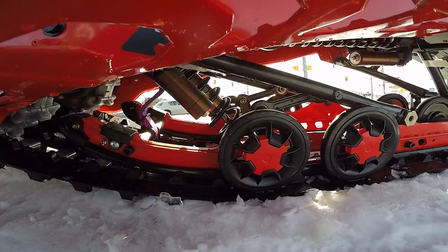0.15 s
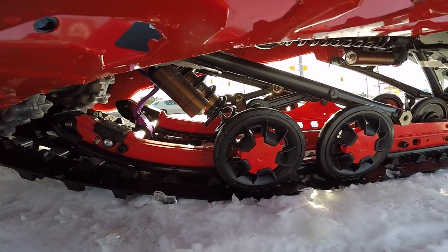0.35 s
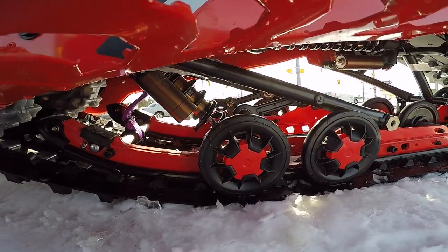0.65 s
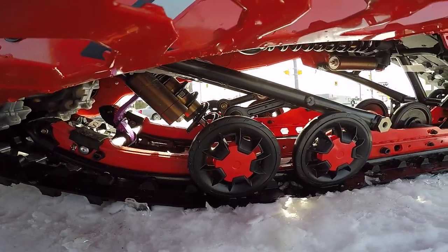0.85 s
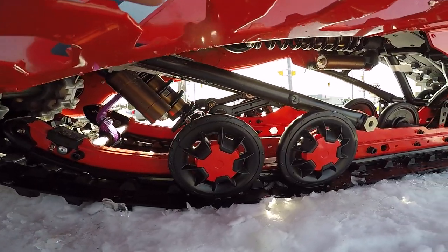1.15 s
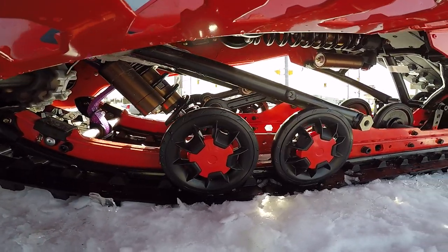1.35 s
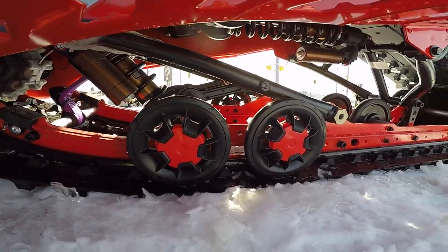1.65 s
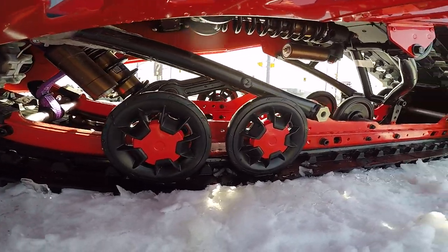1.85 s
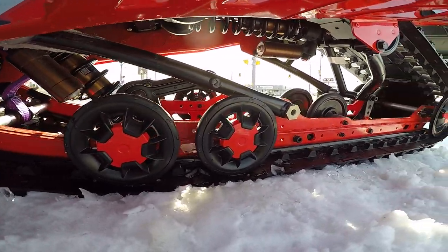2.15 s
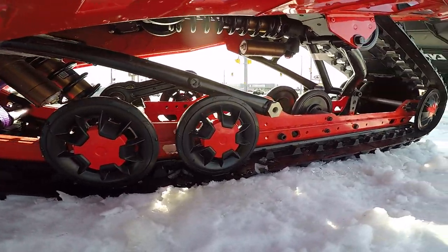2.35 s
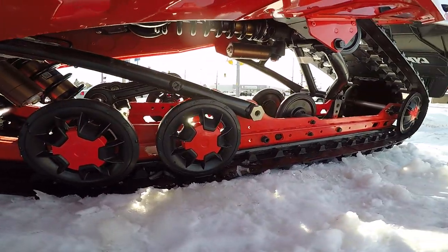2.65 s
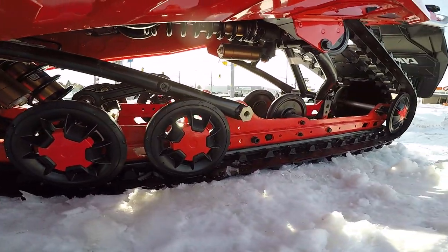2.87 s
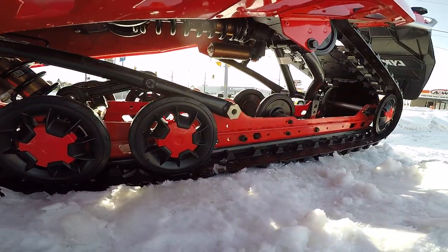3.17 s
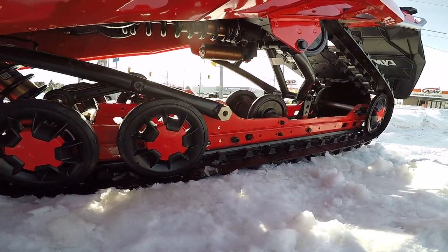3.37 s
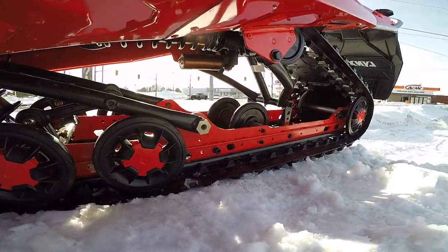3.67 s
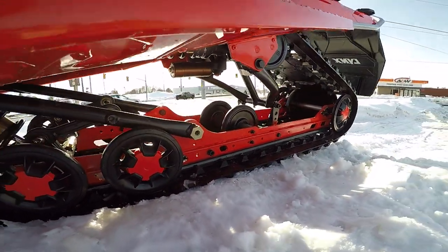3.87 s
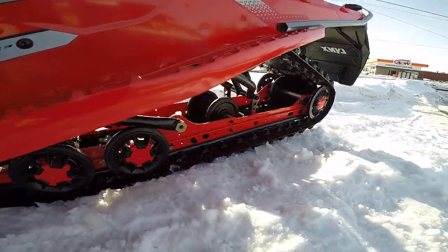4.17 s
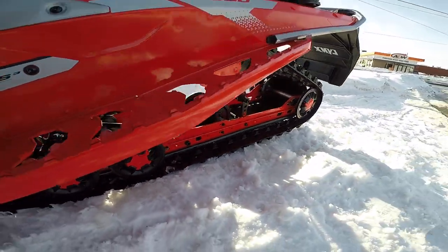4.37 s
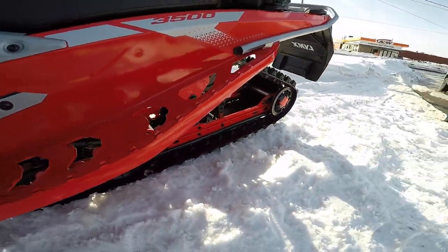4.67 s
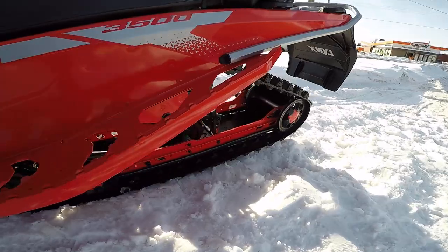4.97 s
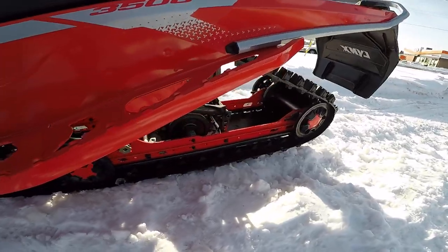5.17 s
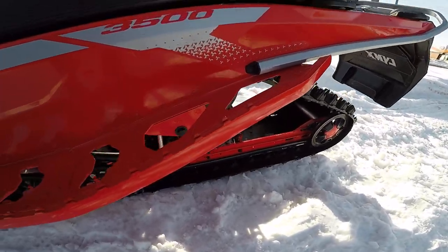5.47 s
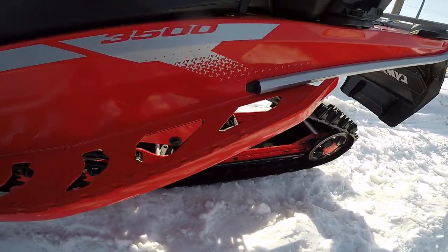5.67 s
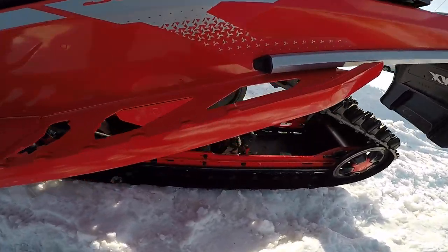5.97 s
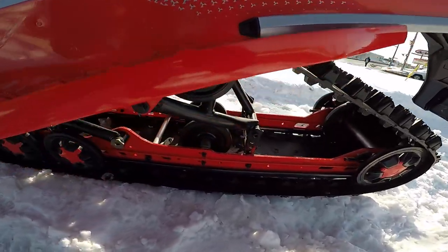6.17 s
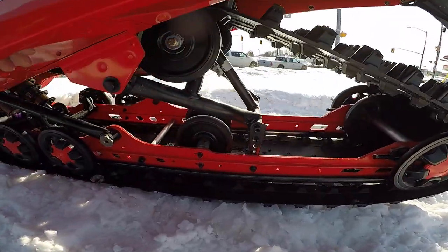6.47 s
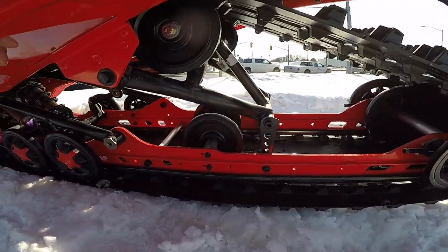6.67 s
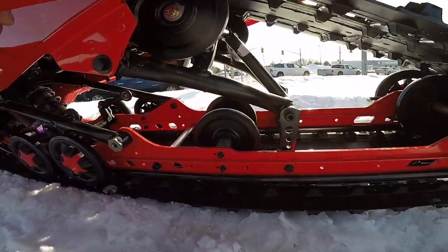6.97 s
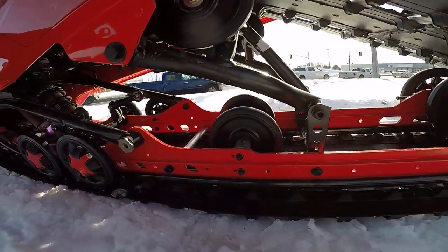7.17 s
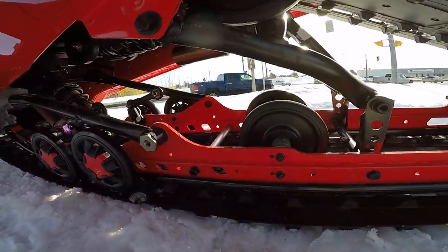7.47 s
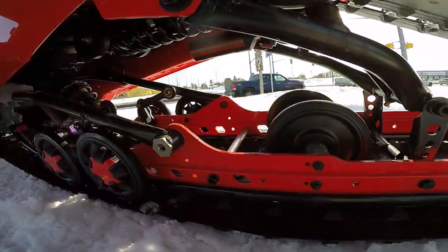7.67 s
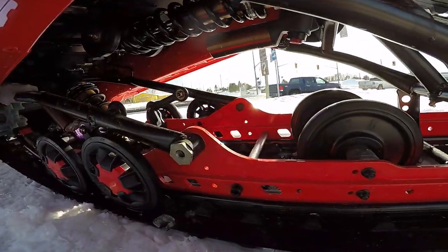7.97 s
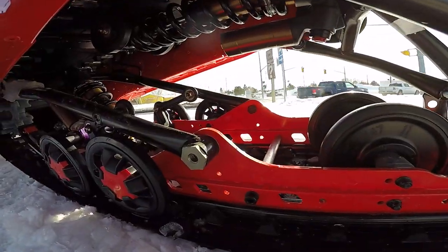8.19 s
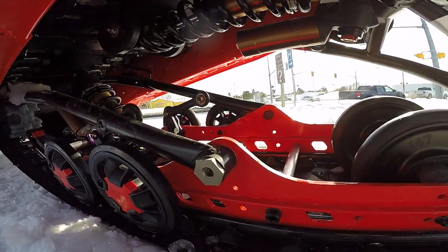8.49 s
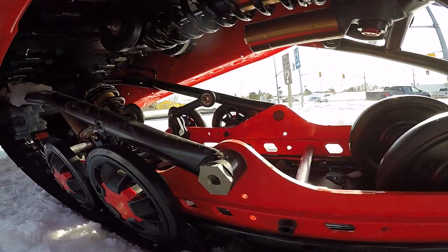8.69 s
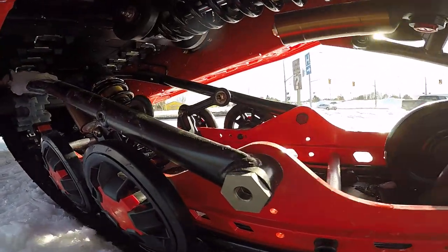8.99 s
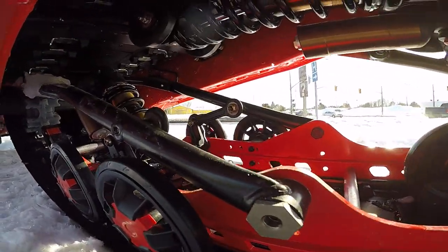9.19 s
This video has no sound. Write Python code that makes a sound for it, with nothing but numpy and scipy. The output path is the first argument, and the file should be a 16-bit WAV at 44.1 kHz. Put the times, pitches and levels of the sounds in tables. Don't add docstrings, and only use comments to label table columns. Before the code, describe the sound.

Wind rumbles on the stereo microphone, then at 0.2 s a sharp housing click lands with a heavy low thump and the sound briefly ducks. A faint slow engine idle appears from about 0.4 s. At 1.5 s the engine revs up quickly, its low pitch roughly doubling by 2 s, wavers up and down until about 4 s, then settles into a steady throaty drone that creeps slightly upward. Wind pops and buffets throughout. Light boot crunches come between 4.2 and 6 s, with another near 8.9 s. At 6.1 to 6.25 s, gusts slap the right side and another click snaps. Wet tyres roar and hiss continuously, brighter after 6.5 s; a vehicle's hum slows and drops around 7.5 s, and a distant truck climbs from 7.8 to 9 s. Strong gusts close the scene at 9.3 s as the drone weakens.

```python
import sys
import numpy as np
from scipy import signal
from scipy.io import wavfile
from scipy.ndimage import uniform_filter1d

SR = 44100
rng = np.random.default_rng(int(sys.argv[2]) if len(sys.argv) > 2 else 0)


def gain_from_db(level_db):
    decades = np.asarray(level_db, float) / 20
    return 10 ** decades


def master(y):
    cut = np.clip(np.atleast_2d(y).T, -1, 1)
    pcm = np.round(cut * 32767)
    wavfile.write(sys.argv[1], SR, pcm.astype(np.int16))


N = 411805
TIME = np.arange(N) / SR
SIDES = np.array([[.5], [-.5]])


def rms_one(x):
    return x / np.sqrt(np.mean(x ** 2) + 1e-20)


def in_time(rows):
    s, *columns = np.transpose(rows)
    return [np.interp(TIME, s, column) for column in columns]


def at_hz(points, hz):
    points_hz, values = np.array(points).T
    return np.interp(np.log(hz), np.log(points_hz), values)


def drift(rate_hz):
    hop = 40
    pole = np.exp(-2 * np.pi * rate_hz * hop / SR)
    white = rng.standard_normal(N // hop + 2002)
    slow = signal.lfilter([1], [1, -2 * pole, pole * pole], white)[2000:]
    return np.interp(np.arange(N) / hop, np.arange(len(slow)), rms_one(slow))


def band(x, low_hz, high_hz, order=2):
    return signal.sosfilt(signal.butter(order, [low_hz, high_hz], "band", fs=SR, output="sos"), x)


def add_damped_swing(out, s, hz, t60, left_right, fall):
    t = np.arange(int(np.clip(t60, .002, .2) * SR)) / SR
    i = max(round(s * SR), 0)
    phase = 2 * np.pi * np.cumsum(hz / (1 + fall * t / t60)) / SR
    onset = np.clip(t / (0.059 * t60), 0, 1)
    wave = np.sin(phase) * gain_from_db(-60 * t / t60) * onset
    out[:, i:i + len(t)] += np.outer(left_right, wave)[:, :N - i]


# pitch_hz, likeness (-1 to 1)
COHERENCE = [(30, 1), (300, 0.63), (600, 0.049), (900, 0.35), (1300, -0.03), (3000, 0.51), (4000, 0.71),
             (6000, 0.64), (7000, 0.31), (8000, 0.35), (12000, -0.9)]
# pitch_hz, left_right_db
PORT_LEAN = [(300, -2.5), (1000, 2.5), (1700, 2.5), (2300, 0), (3200, -1.5), (4200, 0), (5500, 3.5),
             (6300, -1), (7000, -10), (7800, -8), (8800, -11), (10000, -14), (12000, -4.5)]


def banded_noise(spectrum, patchy_db, count):
    edges = np.geomspace(spectrum[0][0], spectrum[-1][0], count + 1)
    out, together, white = 0, drift(2.2), rng.standard_normal((2, 2, N))
    for k, (low, high) in enumerate(zip(edges, edges[1:])):
        mid, side = band(white[k % 2], low, high)
        hz = np.sqrt(low * high)
        alike = np.clip(at_hz(COHERENCE, hz), -1, 1)
        gain = gain_from_db(at_hz(spectrum, hz) + patchy_db * (0.84 * together + drift(12)))
        lean = gain_from_db(at_hz(PORT_LEAN, hz) * SIDES)
        pair = np.sqrt(1 + alike) * mid + np.sqrt(1 - alike) * side * [[1], [-1]]
        out = out + gain * lean * pair
    return rms_one(out)


def orders(hz, levels, on, waver_db, wobble):
    angle = 2 * np.pi * np.cumsum(hz) / SR + wobble * drift(4.2)
    out = 0
    for k, db in levels:
        out = out - np.sqrt(2) * gain_from_db(db + waver_db * drift(4.6)) * np.sin(k * angle)
    return on * out


# start_s, cycle_hz, order_4_db, order_5_db
SLOW_IDLE = [
    (0.4, 20.6, -33.5, -39.5),
    (1.45, 21.08, -27.5, -27),
    (1.55, 21.1, -22.5, -48),
]


def slow_idle():
    hz, db4, db5 = in_time(SLOW_IDLE)
    on = np.interp(TIME, [.3, .45, 1.5, 1.6], [0, 1, 1, 0])
    return orders(hz, [(4, db4), (5, db5)], on, waver_db=3.0, wobble=0.17)


# start_s, cycle_hz, level_db, uneven_db (cylinder unevenness, which feeds the odd orders)
FAST_IDLE = [(1.5, 20.93, -15, -6), (1.61, 22.15, -10, 0.1), (1.78, 33.3, -17.5, 4.5),
             (1.94, 39.35, -15, -1), (2.25, 39.1, -16.5, 2.5), (2.56, 42.4, -15.5, 2), (2.9, 32.46, -15, 1),
             (3.2, 37.5, -15.5, 3.5), (3.53, 42.1, -14.5, 1.5), (4.01, 38.15, -15, 5.5),
             (4.6, 38.7, -12.5, -2), (5.8, 39.05, -12.5, -1.5), (6.4, 39.18, -20, 10.5),
             (7.3, 39.66, -16, 4.5), (7.75, 40.37, -24, 7.5), (8.3, 40.76, -15.5, -2),
             (8.85, 41.21, -20, 10.5), (9.15, 41.5, -22, 7)]
# order, level_db
PIPE_ORDERS = [(2, 0.9), (3, -6), (4, -12)]
# order, level_db
UPPER_ORDERS = [(5, -50), (6, -35), (7, -51), (8, -52)]
# pitch_hz, level_db
PIPE_RADIATION = [(42, -28), (66, -3), (78, 0.8), (100, 1), (120, -0.4), (160, 1.1), (200, -3.5), (240, -2)]


def fast_idle():
    hz, loud_db, uneven_db = in_time(FAST_IDLE)
    hz = uniform_filter1d(hz, size=SR // 18)
    levels = [(k, loud_db + db + at_hz(PIPE_RADIATION, k * hz) + uneven_db * (k % 2))
              for k, db in PIPE_ORDERS]
    firing_db = levels[0][1]
    levels += [(0.74, firing_db - 36)]
    settle_db = np.interp(TIME, [3.2, 3.8], [-8, 0])
    upper_db = 0.21 * (loud_db - loud_db.mean()) + settle_db
    levels += [(k, db + at_hz(PIPE_RADIATION, k * hz) + upper_db) for k, db in UPPER_ORDERS]
    on = np.interp(TIME, [1.48, 1.58, 9.15, 9.33], [0.05, 0.88, 0.71, .15])
    burble = rng.standard_normal((2, N))
    burble = rms_one(band(burble[0] + .5 * burble, 330, 650))
    return orders(hz, levels, on, waver_db=0.68, wobble=0.035) + gain_from_db(firing_db - 38) * burble


# start_s, level_db
BREEZE = [(0, -13.5), (.19, -14.5), (.25, -29.5), (.6, -35), (1.2, -34), (2.0, -33.5), (3.0, -32),
          (4.0, -23.5), (4.4, -35), (5.4, -40), (6.0, -23.5), (6.5, -36), (7.0, -33.5), (7.5, -16.5),
          (8.4, -24.5), (9.1, -16.5), (9.34, -16.5)]
# peak_s, peak_db, half_length_s
GUST_SWELLS = [(1.143, -31.5, 0.6), (1.692, -23.5, 0.6), (2.384, -15, 0.12), (2.94, -18.5, 0.9),
               (3.195, -23, 0.094), (3.737, -16.5, 0.11), (4.65, -24, 0.15), (6.205, -21, 0.15),
               (7.687, -21, 0.28), (8.012, -20, .16), (8.808, -16, 0.18), (9.132, -8.5, 0.15)]


def wind():
    breeze = gain_from_db(in_time(BREEZE)[0])
    gusts = sum(gain_from_db(db) * np.clip(1 - np.abs(TIME - s) / half, 0, 1) ** 2
                for s, db, half in GUST_SWELLS)
    lumps = gain_from_db(3.2 * np.array([drift(9), drift(9)]))
    buffet = rms_one(band(rng.standard_normal((2, N)), 28, 116) * lumps)
    buffet = rms_one(buffet - .12 * buffet[::-1])
    flicker = gain_from_db(2.0 * np.array([drift(30), drift(30)]))
    flutter = band(rng.standard_normal((2, N)), 142, 294, order=3) * lumps * flicker
    flutter = rms_one(flutter - 0.31 * flutter[::-1]) * gain_from_db(-3.0 * SIDES)
    rasp = rms_one(band(rng.standard_normal(N), 380, 800) * gain_from_db(6.0 * drift(40))) * [[.75], [-1]]
    buffet = buffet * (gain_from_db(-1.5) * breeze + gain_from_db(-1.0) * gusts)
    flutter = flutter * (gain_from_db(-13) * breeze + gain_from_db(-16) * gusts)
    rasp = rasp * (gain_from_db(-20.5) * breeze + gain_from_db(-32.5) * gusts)
    return buffet + flutter + rasp


# start_s, thud_db, snap_db (above thud), left_right_db
EDDY_POPS = [(0.034, -16.5, -15, -4), (0.113, -13, -21, 15), (0.832, -9, 4.5, 1), (0.956, -18, -12, 1),
             (1.17, -23, -19, 3), (1.224, -14.5, 4, -10.5), (1.278, -16.5, -11, 0), (2.196, -20.5, 1, -3),
             (2.373, -12.5, -8, -4.5), (2.72, -17, -19, -11.5), (3.03, -15.5, -18, -6),
             (3.614, -29, 7.5, -8), (3.713, -16.5, -18, -8), (3.764, -21, -6, 3), (3.918, -29, 9, -2),
             (5.08, -21.5, -4, -10), (5.9, -22, -6, 0), (6.111, -10, -2.5, -10), (6.147, -14, -26, -2.5),
             (6.248, -9, -3.5, -1), (7.068, -22, -9, -7.5), (7.356, -22, -7, 1), (7.601, -15.5, -9, -6),
             (7.716, -12.5, -29, -6), (8.026, -21, -7, 12), (8.356, -18, 4, -2), (8.779, -13, -11, 3),
             (8.912, -8.5, -5, 9), (9.035, -9.5, -5, 3), (9.258, -12, -25, 18)]


def pops():
    out, chance = np.zeros((2, N)), rng.random((len(EDDY_POPS), 3))
    for (s, thud_db, snap_db, lean_db), (low, high, flip) in zip(EDDY_POPS, chance):
        sign = 1 if flip > .5 else -1
        snap = sign * gain_from_db(thud_db + snap_db + 12.0) * np.array([.85, -1])
        thud = sign * gain_from_db(thud_db + 11.0 + lean_db * SIDES[:, 0]) * [-.6, 1]
        add_damped_swing(out, s, 600 + 200 * high, .009, snap, fall=1.5)
        add_damped_swing(out, s, 280 + 80 * low, .035, thud, fall=6.2)
    return band(out + 1e-18, 45, 1600)


# start_s, level_db, decay_s
GUST_SLAPS = [
    (6.111, -11, 0.064),
    (6.247, -15, 0.048),
    (9.235, -20, 0.14),
    (0.37, -28, 0.065),
]


def slaps():
    level = sum(gain_from_db(db - 60 * np.clip(TIME - s, 0, 1) / decay) * (TIME >= s)
                for s, db, decay in GUST_SLAPS)
    noise = band(level * rng.standard_normal(N) + 1e-18, 217, 423) * [[-2.5], [18]]
    return band(noise + 1e-18, 45, 1600)


# start_s, peak_db, left_right_db, decay_s
HOUSING_CLICKS = [
    (0.1837, -10, -8, 0.0058),
    (6.2295, -9.5, -12.5, 0.0073),
]
# pitch_hz, width_hz, level_db
HOUSING_MODES = [
    [(1150, 1000, 3), (3330, 1400, -2), (5000, 950, -6), (7000, 800, -4.5), (10000, 650, -12.5),
     (13300, 1200, -33.5)],
    [(1500, 1500, -16.5), (4630, 790, -6), (5270, 630, -4.5), (6530, 990, 0), (7200, 1100, -7),
     (9800, 1100, -16.5), (13500, 1500, -28)],
]


def clicks():
    out = np.zeros((2, N))
    t = TIME[:SR // 20]
    for (s, db, lean_db, decay), modes in zip(HOUSING_CLICKS, HOUSING_MODES):
        crackle = rng.standard_normal((2, len(t)))
        crackle[:, 0] = 2.95
        crackle = (crackle[0] + 0.35 * crackle) * gain_from_db(-60 * t / decay)
        for hz, width_hz, mode_db in modes:
            rung = band(crackle, hz - width_hz / 2, hz + width_hz / 2)
            out[:, round(s * SR):][:, :len(t)] += gain_from_db(db + mode_db + 3.0 + lean_db * SIDES) * rung
    return out


# start_s, peak_db, pitch_hz
PRESSURE_THUMPS = [
    (.1845, -8, 400),
    (.1868, -0.5, 70),
    (.313, -4.5, 27),
]


def thumps():
    swings = np.zeros(N)
    for s, db, hz in PRESSURE_THUMPS:
        turn = np.clip((TIME - s) * hz, 0, 1)
        swings += gain_from_db(db + 1.2) * np.sin(2 * np.pi * turn ** .85) * (1 - .5 * turn)
    return signal.sosfilt(signal.butter(2, 900, fs=SR, output="sos"), swings)


# pitch_hz, level_db (per Hz)
ROAR_SPECTRUM = [(300, 3), (500, -8.5), (750, -4.5), (950, -0.5), (1250, -5.5), (1500, -4), (1900, -16),
                 (2400, -15)]
# pitch_hz, level_db (per Hz)
SLUSH_SPECTRUM = [(1500, 0.5), (2000, -0.5), (2800, 1), (3500, -2.5), (4200, 2.5), (5000, -15.5)]
# pitch_hz, level_db (per Hz)
HISS_SPECTRUM = [(4300, -9), (5000, -7), (5600, 0.5), (6200, 3), (6900, -4), (7800, -8), (9000, -19),
                 (11000, -35.5), (13500, -38.5)]


def surface_noises():
    roar = banded_noise(ROAR_SPECTRUM, patchy_db=0.47, count=9)
    slush = banded_noise(SLUSH_SPECTRUM, patchy_db=0.75, count=6)
    hiss = banded_noise(HISS_SPECTRUM, patchy_db=1.25, count=10)
    return roar, slush, hiss


# start_s, bright_db, dull_db, length_s
BOOT_CRUNCHES = [
    (0.107, -50, -44.5, 0.02),
    (4.221, -43.5, -56.5, 0.094),
    (4.802, -40, -45, 0.021),
    (4.835, -57.5, -41.5, 0.035),
    (4.977, -52.5, -53, 0.023),
    (5.315, -40.5, -40, 0.032),
    (5.614, -51.5, -50.5, 0.1),
    (5.807, -48, -44.5, 0.097),
    (5.929, -55.5, -44, 0.099),
    (8.893, -48.5, -41, 0.08),
]


def crunch_level(column):
    shape = 0
    for row in BOOT_CRUNCHES:
        s, length = row[0], row[3]
        envelope = np.interp(TIME - s, [0, .005, length / 2, 1.7 * length], [0, 0.59, 0.57, 0.027])
        shape = shape + gain_from_db(row[column]) * envelope
    return shape * gain_from_db(1.7 * drift(90))


def boots():
    roar, slush, hiss = surface_noises()
    bright = rms_one(signal.lfilter([1, -.95, .9], [1], hiss))
    return crunch_level(column=1) * bright + crunch_level(column=2) * (slush + roar + 1.16 * hiss)


# start_s, pitch_hz, level_db
SLOWING_VAN = [
    (6.3, 103.7, -49),
    (6.7, 102.8, -20.5),
    (7.1, 102.7, -28.5),
    (7.4, 90.56, -27),
    (7.7, 66.4, -22),
    (7.85, 55, -48.5),
]
# start_s, pitch_hz, level_db
FAR_CAR = [
    (4.1, 261, -54),
    (4.4, 273.7, -48),
    (4.8, 289.3, -44),
    (5.2, 302, -57),
]
# start_s, pitch_hz, level_db
FAR_TRUCK = [
    (7.7, 212, -45),
    (7.9, 218, -34),
    (8.2, 222, -35.5),
    (8.45, 230, -31),
    (8.7, 243, -32),
    (8.95, 243, -38),
    (9.1, 243, -47),
]


def far_vehicles():
    hz, db = in_time(SLOWING_VAN)
    van_on = (TIME > 6.3) & (TIME < 7.85)
    van = orders(hz, [(1, db), (2, db - 17)], van_on, waver_db=3.0, wobble=0.16)
    hz, db = in_time(FAR_CAR)
    car = orders(hz, [(0.96, db)], (TIME > 4.1) & (TIME < 5.2), waver_db=5.5, wobble=.3)
    hz, db = in_time(FAR_TRUCK)
    truck = orders(hz, [(1, db)], TIME > 7.7, waver_db=1.5, wobble=.2)
    return van + car + truck


# closest_s, level_db, approach_db_per_s, departure_db_per_s
CAR_PASSES = [
    (1.199, -49, 7, 3),
    (7.0, -42, 54, 1.5),
    (8.601, -47, 12.5, 10),
]


def tread_whirr():
    level = 0
    for s, db, rise, fall in CAR_PASSES:
        approach_db = rise * np.clip(s - TIME, 0, None)
        departure_db = fall * np.clip(TIME - s, 0, None)
        gone_db = 26.5 * np.clip(TIME - s - 0.71, 0, .4)
        level = level + gain_from_db(db - approach_db - departure_db - gone_db)
    whirr = rng.standard_normal((2, N))
    whirr = rms_one(band(whirr[0] + 1.4 * whirr, 1153, 1420))
    return level * gain_from_db(0.91 * drift(8.9)) * whirr


# start_s, level_db, bright_db (as wet tyres come near)
TRAFFIC = [(0, -45, -5), (.8, -47, -7), (1.2, -45, -3), (2.0, -44, -8), (3.8, -47, -1), (5.0, -42.5, -5.5),
           (5.6, -43, -1), (6.0, -43, -4.5), (6.5, -44, 4.5), (7.3, -40, 2.5), (7.7, -44, 6),
           (8.3, -39.5, 0.4), (9.0, -40.5, -0.3), (9.32, -43.5, 1.8)]
# pitch_hz, level_db (per Hz)
RUMBLE_SPECTRUM = [(20, 3), (50, -0.5), (90, 5), (130, 3.5), (220, -11.5), (350, -18.5), (500, -47.5)]


def road():
    loud_db, bright_db = in_time(TRAFFIC)
    breeze_db, = in_time(BREEZE)
    roar, slush, hiss = surface_noises()
    rumble_db = -25 + 0.18 * (breeze_db - breeze_db.mean()) + .6 * (loud_db - loud_db.mean())
    rumble = gain_from_db(rumble_db) * banded_noise(RUMBLE_SPECTRUM, patchy_db=0.0, count=9)
    tyres = gain_from_db(2.5) * roar + gain_from_db(1.5 + bright_db) * slush + gain_from_db(0.5 + 0.73 * bright_db) * hiss
    return rumble + gain_from_db(loud_db) * tyres


def scene():
    near = slow_idle() + fast_idle() + wind() + pops() + slaps() + clicks() + thumps() + boots()
    return near + far_vehicles() + tread_whirr() + road()


def top_cut(x):
    return signal.sosfilt(signal.butter(12, 14600, fs=SR, output="sos"), x)


# start_s, depth_db, attack_s, recovery_s
GAIN_DUCKS = [
    (0.191, 6, 0.0056, 0.088),
    (.3, 6.5, 0.093, 0.33),
    (6.111, 5.5, 0.0034, 0.014),
    (6.254, 7, 0.013, 0.018),
    (9.04, 3, 0.0039, 0.038),
]


def record(dry):
    duck_db = 0
    for s, db, attack, back in GAIN_DUCKS:
        low = s + attack
        duck_db = duck_db + db * np.interp(TIME, [s, low, low + 0.0098, low + 0.027 + 2 * back], [0, 1, 1, 0])
    left = signal.lfilter(*signal.iirnotch(8700, 4.0, fs=SR), dry[0])
    self_noise = gain_from_db(-64.5) * rms_one(band(rng.standard_normal((2, N)), 7000, 11060))
    ports = np.array([left, dry[1]]) + self_noise
    mix = np.tanh(ports * gain_from_db(-duck_db) / 0.87)
    mix = mix * np.clip((TIME[-1] - TIME) / .004, 0, 1)
    return top_cut(mix)


dry = scene()
out = record(dry)
master(out)
```